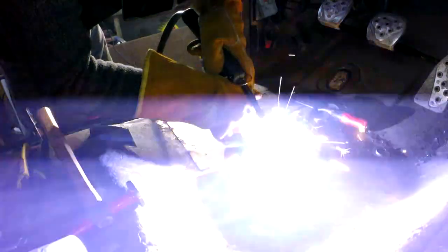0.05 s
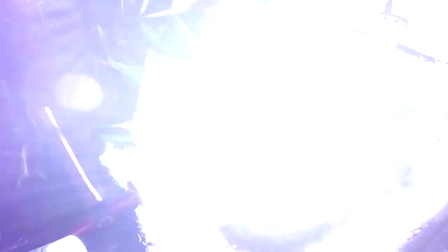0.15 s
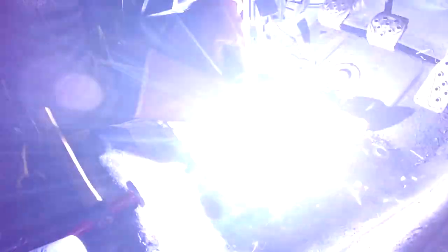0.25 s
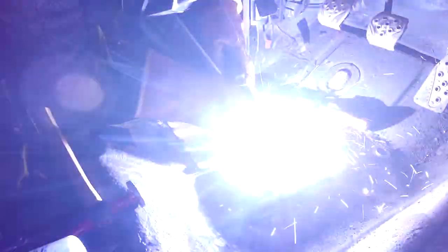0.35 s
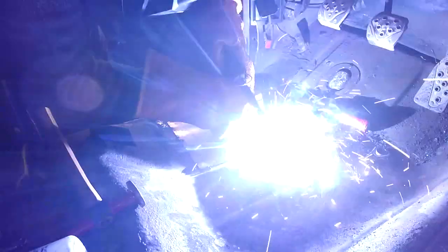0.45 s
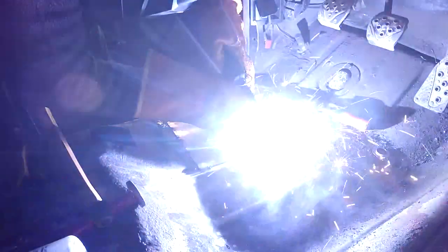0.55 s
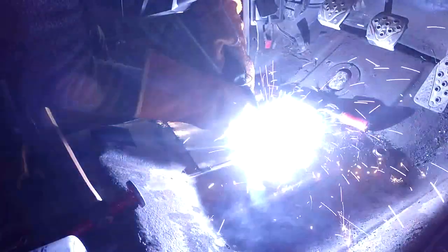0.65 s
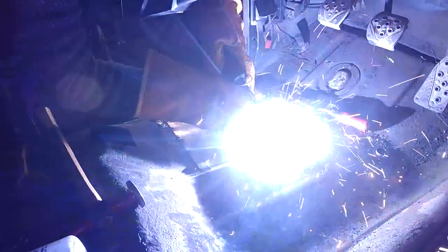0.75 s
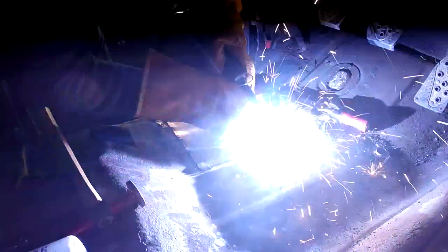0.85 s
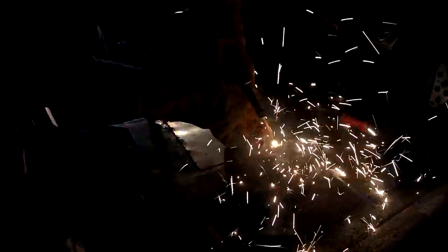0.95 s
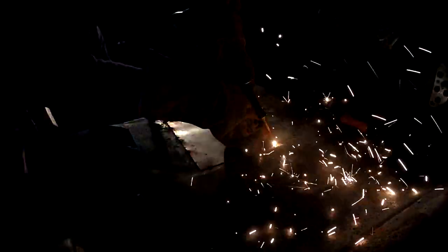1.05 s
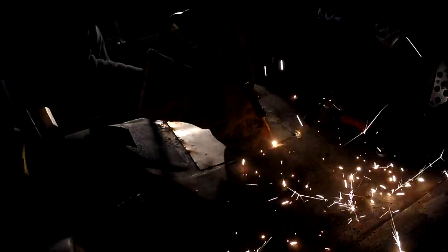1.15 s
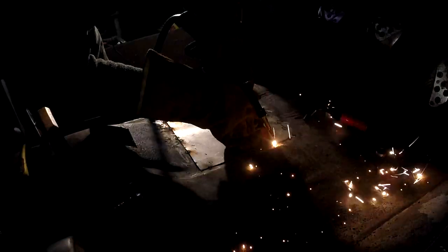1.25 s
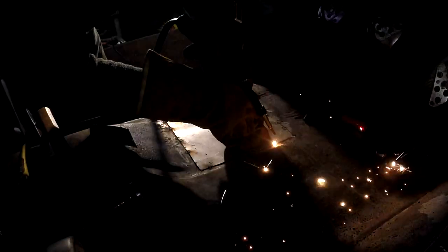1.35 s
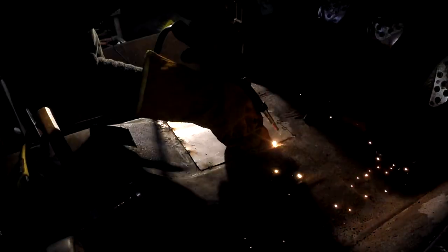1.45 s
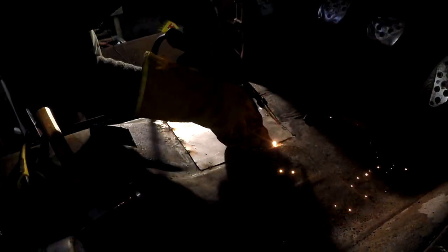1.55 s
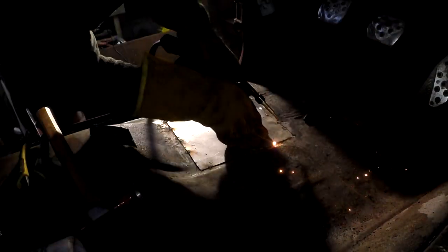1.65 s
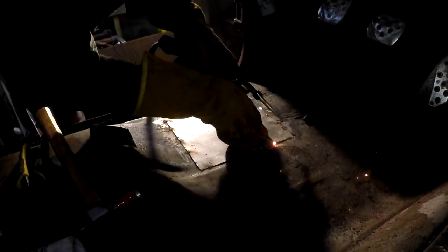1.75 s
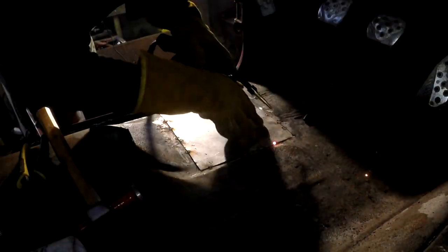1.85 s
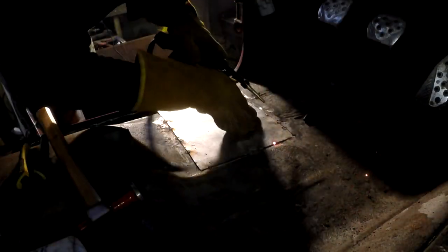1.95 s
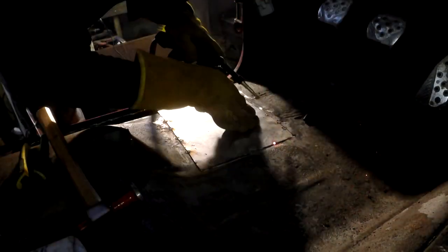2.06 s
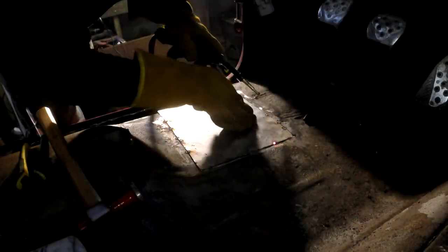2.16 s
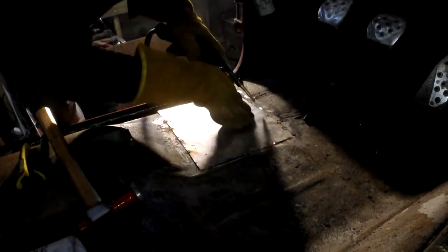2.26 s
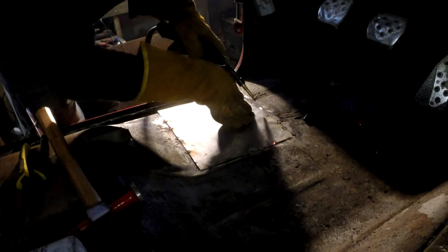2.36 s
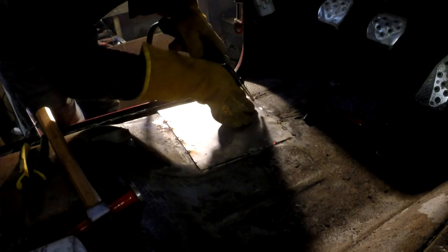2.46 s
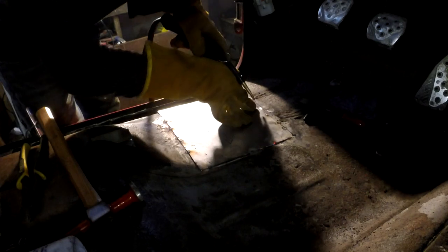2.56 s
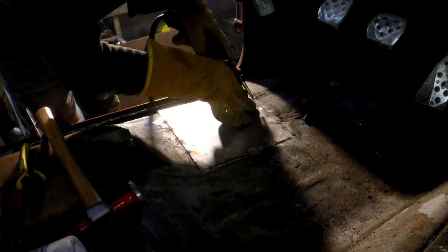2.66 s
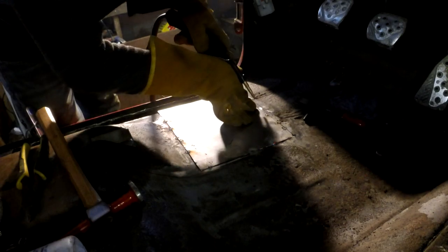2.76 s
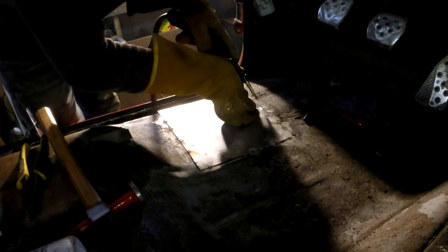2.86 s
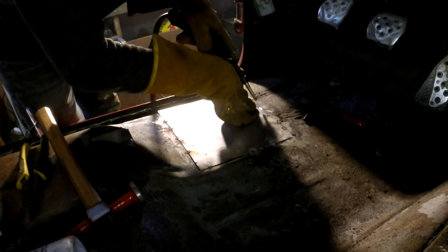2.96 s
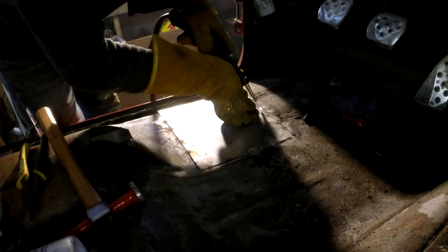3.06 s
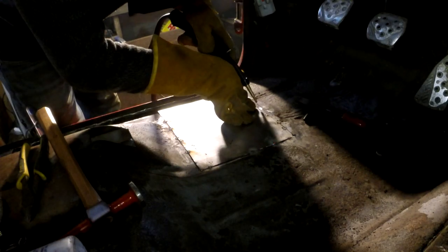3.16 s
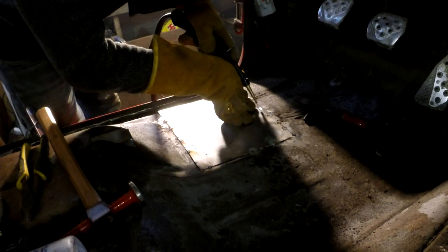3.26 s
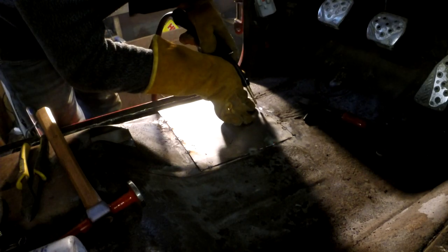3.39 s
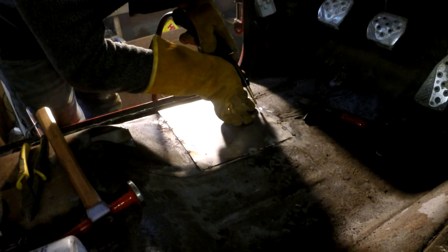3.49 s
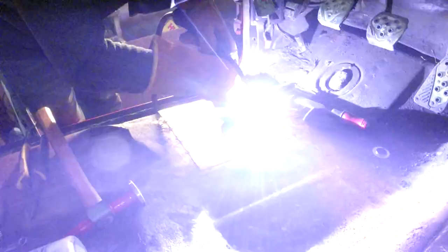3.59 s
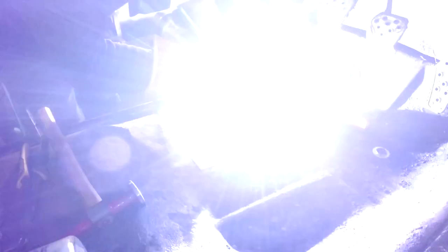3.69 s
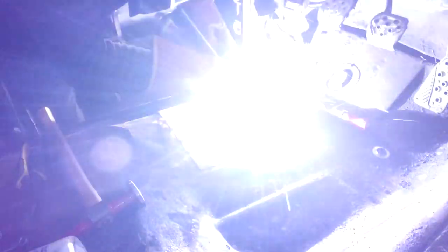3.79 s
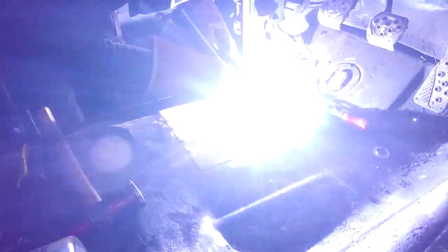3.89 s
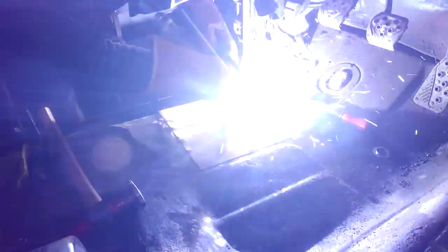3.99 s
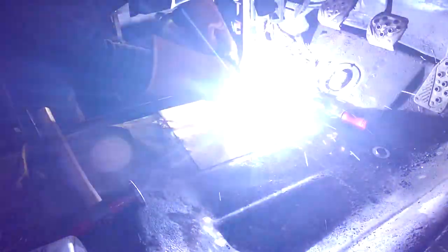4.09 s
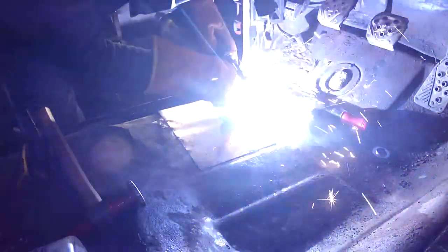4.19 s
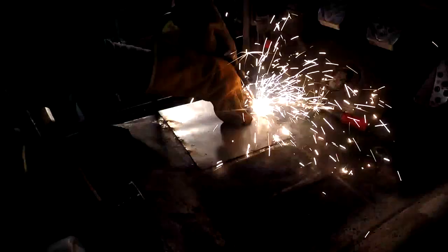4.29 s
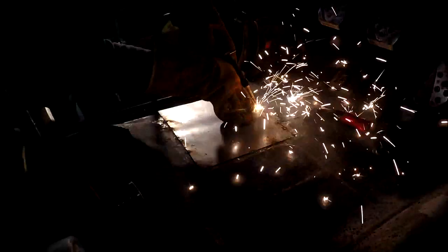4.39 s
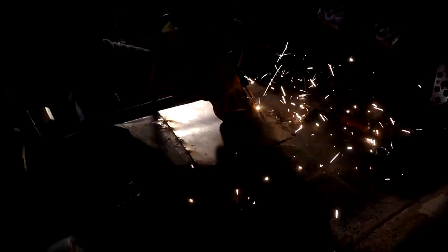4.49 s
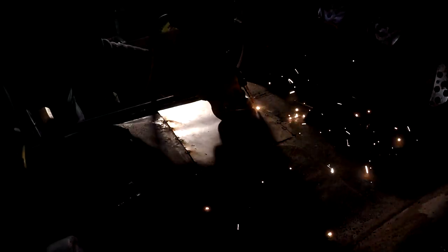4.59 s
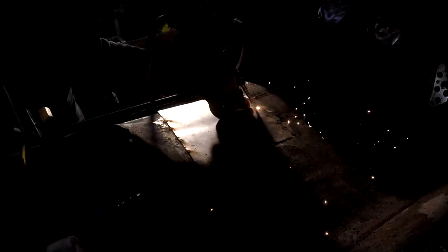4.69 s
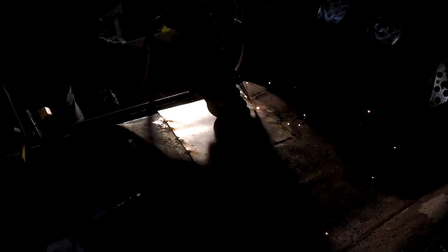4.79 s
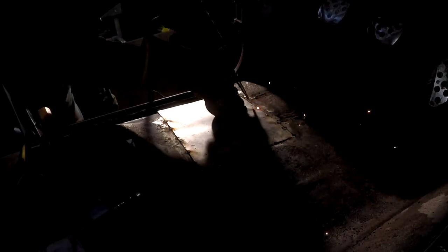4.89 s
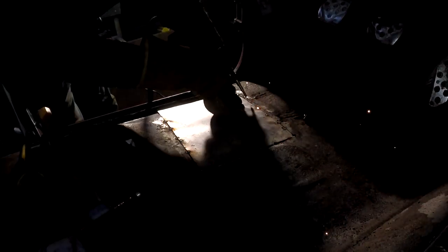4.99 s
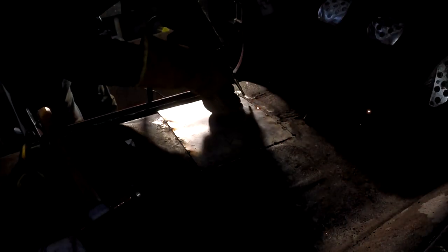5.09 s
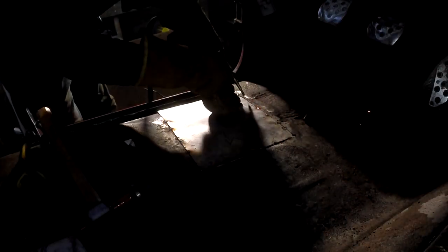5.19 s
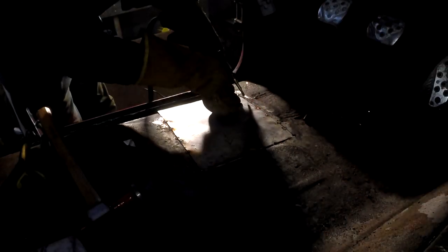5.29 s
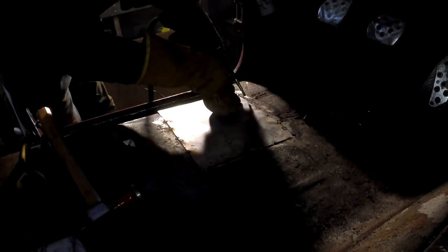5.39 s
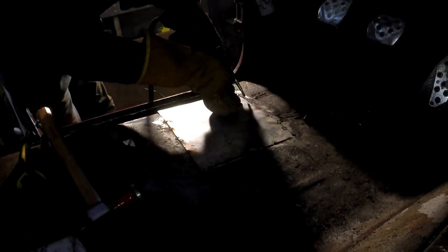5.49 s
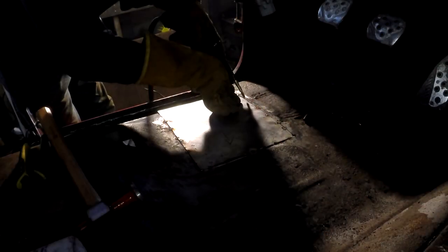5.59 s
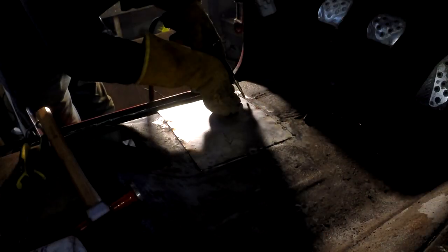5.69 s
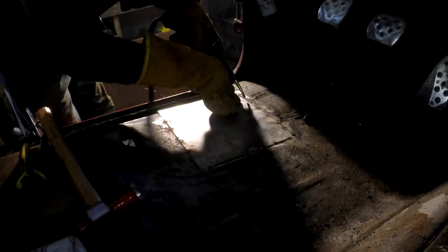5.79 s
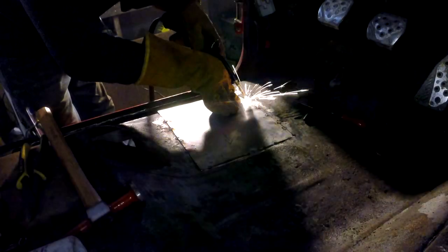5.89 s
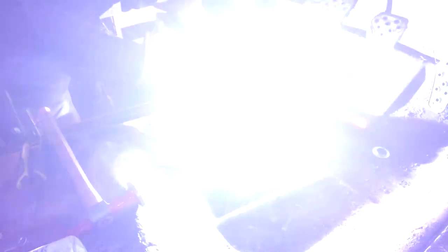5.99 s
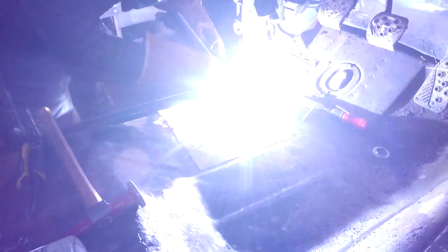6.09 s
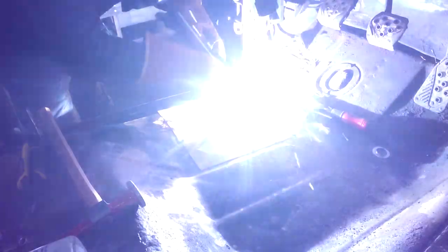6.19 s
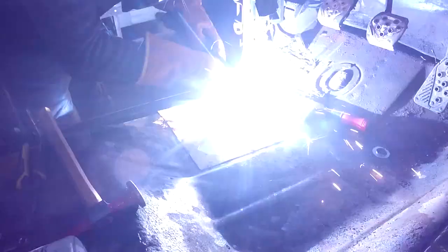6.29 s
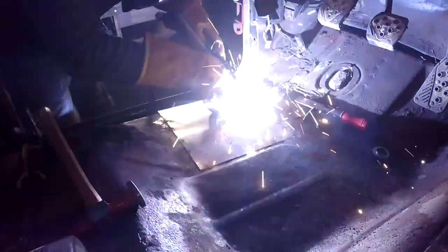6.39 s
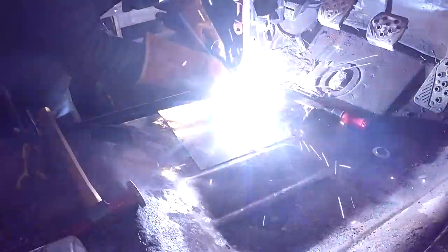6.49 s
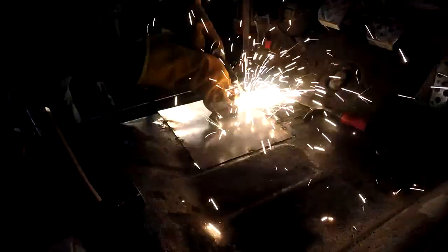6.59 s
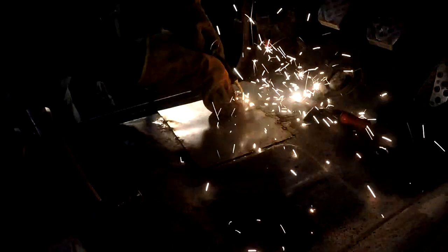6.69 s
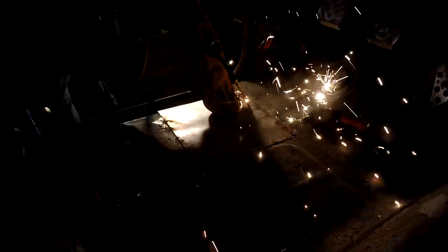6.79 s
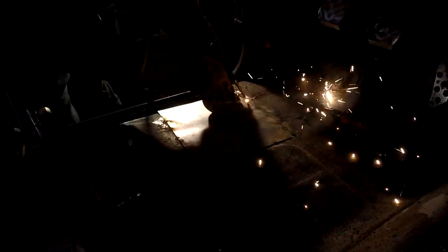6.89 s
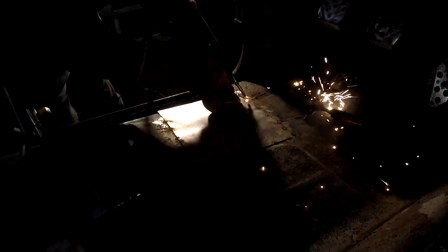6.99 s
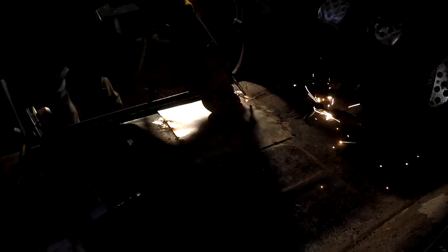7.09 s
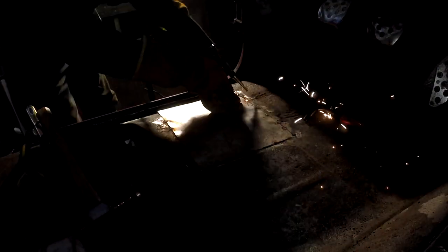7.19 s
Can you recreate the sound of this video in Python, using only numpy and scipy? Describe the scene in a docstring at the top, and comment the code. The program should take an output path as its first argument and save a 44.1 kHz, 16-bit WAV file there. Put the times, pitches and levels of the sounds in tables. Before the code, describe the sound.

A close welding arc sputters and snaps, stops to fading sizzle and droning hum, then fires twice more in brief crackling bursts.

```python
"""An arc is alight at once, close by: sharp pops over a mains-paced crackle, with gas hiss and loaded hum.
The place is the steel floor of a car body in a workshop, where a wire-feed welder lays three short welds.
Pops and crackle are impulse trains, each with a noise spray, rung through cabin reflections and panel modes.
Filtered noise makes the fading sizzle and sliding glove, filtered impulses the ticks, noise bursts the thumps.
The idling machine drones in wavering sines over a noise rush; one microphone hears it all from beside the weld."""
import sys
import numpy as np
from scipy import signal
from scipy.fft import rfft, irfft
from scipy.io import wavfile
from scipy.ndimage import uniform_filter1d

SR = 44100
rng = np.random.default_rng(int(sys.argv[2]) if len(sys.argv) > 2 else 0)


def waveform_to_disk(signal):
    """Save audio, clipped to [-1, 1], as 16-bit WAV at the path in sys.argv[1]."""
    frames = np.transpose(np.atleast_2d(signal))
    scaled = np.clip(frames, -1, 1) * 32767
    samples = np.round(scaled).astype(np.int16)
    wavfile.write(sys.argv[1], SR, samples)


N = 319725
T = np.arange(N) / SR  # time in seconds

MAINS_HZ = 60
HALF_CYCLE_S = 1 / (2 * MAINS_HZ)
TRIGGER_LEAD_S = .03  # current and gas come on this long before the arc
RUN_FADE_DB, RUN_SCATTER_DB = 10.5, 2  # fall over the length of a run of pops; unevenness of its pops
TOP_HZ = 15300  # upper edge of what the recorder keeps

# Levels in the tables are relative; the functions add gains and filters.
# The three welds: start_s, end_s, crackle_db, transformer_hum_db, sizzle_db, sizzle_fading_db_per_s
WELDS = [(-0.001, 1.077, -31.5, 1.5, -54.5, 22), (3.774, 4.448, -31, 3, -59, 22),
         (6.059, 6.764, -31, -6.5, -56, 12)]
# Shielding gas leaving the nozzle: frequency_hz, level_db
GAS_COLOUR = [(1500, -17), (4000, -6.5), (5000, -5), (6500, -8.5), (11000, -12.5), (15500, -4)]
# The transformer under welding load: multiple_of_mains, level_db
LOAD_HUM = [(1, -57.5), (2, -61), (3, -53.5), (4, -56)]
# Air of the workshop: frequency_hz, level_db
SHOP_COLOUR = [(20, -9.5), (50, -5.5), (85, 0.5), (140, -8.5), (230, 0), (340, -10), (520, -7.5), (750, -9),
               (1100, -15), (2200, -21), (4500, -30), (8000, -39.5), (15000, -50)]
# Drone of the idling machine and its fan: pitch_hz, level_db, wander_width_hz
IDLE_HUM = [(61.6, -80, 11), (92.5, -58.5, 4), (186.5, -74.5, 10), (229, -69, 8), (263.7, -53.5, 3.2),
            (378, -70.5, 5), (800, -67, 18)]
# Sizzle of the hot bead: frequency_hz, level_db
SIZZLE_COLOUR = [(400, -8), (1200, 4), (4000, -0.5), (7000, -4), (12000, -10.5), (15500, -13)]
# Spatter landing on the steel: start_s, level_db
TICKS = [(1.2146, -48), (1.267, -47), (1.699, -52), (2.7032, -51), (4.5916, -53), (4.6147, -48.5),
         (5.4611, -57), (5.4835, -55), (6.879, -53.5)]
# The wire burns back and the crackle stalls: start_s, end_s, level_change_db
STALLS = [(0.068, 0.096, -22), (0.125, 0.239, -39), (0.573, 0.606, -10), (1.0, 1.084, -12),
          (3.885, 3.86, -5), (3.991, 4.038, -18), (6.058, 6.108, -4), (6.111, 6.199, -11),
          (6.428, 6.456, -12), (6.555, 6.597, -5.5)]
# The wire stubs into the pool and blows clear, alone or with a run of weaker pops behind:
# start_s, level_db, body_over_snap_db, run_length_s
POPS = [(0.014, -21.5, 9, 0), (0.0257, -19.5, 5, 0), (0.0352, -11.5, -1.5, 0.0094), (0.0403, -21, -5, 0),
        (0.0541, -21, -5, 0.0086), (0.0883, -19, -11, 0), (0.0907, -13.5, 0.5, 0), (0.1721, -20.5, -3, 0),
        (0.2522, -18.5, -10, 0), (0.2560, -18.5, 0, 0.016), (0.2731, -18, 7, 0), (0.2891, -23, 6, 0.004),
        (0.3452, -23.5, -10, 0), (0.4747, -21.5, 2.5, 0.017), (0.5236, -20.5, 1.5, 0.015),
        (0.5492, -19.5, -7, 0.0087), (0.591, -17.5, 1, 0), (0.6028, -16.5, 0, 0.014),
        (0.615, -18.5, 1.5, 0.064), (0.6828, -21, 4, 0), (0.7312, -24, 15.5, 0), (0.8083, -19, -1.5, 0),
        (0.8912, -19, 4, 0.012), (0.9154, -18.5, 2, 0.041), (0.9738, -16, 0, 0), (1.0071, -20.5, 6.5, 0),
        (1.0484, -17.5, -1.5, 0), (1.0743, -24, 6, 0), (3.7795, -12.5, 2.5, 0), (3.7905, -15.5, -5, 0.044),
        (3.833, -17, 1, 0), (3.84, -15.5, -0.5, 0.0084), (3.8995, -15.5, 2, 0.0072), (3.9246, -16.5, 5, 0),
        (3.9652, -26, -12, 0), (3.9997, -16, -1, 0), (4.0354, -17, 0, 0), (4.0678, -20.5, 2, 0.018),
        (4.1423, -15.5, -2.5, 0), (4.1931, -27.5, -7, 0.03), (4.319, -17.5, -1, 0),
        (4.3332, -19.5, 4, 0.04), (4.393, -15, 2, 0), (4.4337, -16, 2.5, 0), (4.4407, -21, -3, 0),
        (4.4565, -22, 0.5, 0), (6.0626, -14, 0.5, 0.0043), (6.1275, -10, -1, 0), (6.2085, -29, 7, 0),
        (6.2113, -19, 7, 0), (6.219, -19, 8.5, 0.0071), (6.292, -23, -3, .012), (6.3098, -24, 1, 0.011),
        (6.3253, -16.5, -4, 0), (6.3343, -20.5, 2, 0), (6.342, -14.5, 2.5, 0.0092), (6.3663, -22, -7, 0),
        (6.3771, -23.5, -3, 0), (6.4104, -19.5, 5, 0), (6.4274, -20.5, 0, 0), (6.46, -24, -2, 0),
        (6.4668, -19, 1, 0), (6.4763, -20, 2, 0), (6.499, -20.5, -2, 0.0051), (6.5256, -22.5, 0, 0.03),
        (6.6084, -24, -4, 0), (6.6252, -25, 7, 0), (6.6423, -20.5, 7, 0.021), (6.6594, -17, 1, 0.003),
        (6.692, -23, 11.5, 0.038), (6.7104, -18.5, -2, 0), (6.7242, -19.5, 3, 0.0074), (6.7585, -19, -1, 0)]
# Colour of the whole arc sound: frequency_hz, level_db
ARC_COLOUR = [(40, -46.5), (110, -16.5), (290, 1), (420, -9), (700, -8), (1000, -1.5), (1900, -3),
              (3100, 0), (4200, 1.5), (5100, -3), (7000, -2.5), (10000, -3), (13000, -9), (15500, -10)]
# Modes of the floor pan at each spot, one list a weld: pitch_hz, width_hz, level_db
PANEL_MODES = [
    [(538, 77, 9), (850, 230, 2.5), (1240, 71, -3), (3000, 87, 4.5), (4080, 130, -2), (4260, 240, -4.5),
     (5240, 340, -5), (9190, 210, -5), (11400, 360, 6)],
    [(560, 37, 10), (790, 21, 6.5), (1293, 13, 5.5), (2316, 370, -1.5), (3210, 110, -9.5),
     (3700, 120, -15.5), (6195, 150, 6), (7100, 350, -0.5), (9570, 300, -12)],
    [(572, 31, 13.5), (873, 66, -1.5), (1327, 29, 5.5), (1630, 33, -1), (2360, 120, 1), (3347, 51, 8.5),
     (3950, 140, 3), (6540, 500, 0), (8840, 68, -20)],
]
# Low thumps and knocks: trigger and current surge, arc rumble, hand and torch on the panel:
# start_s, level_db, pitch_hz, decay_s (by 60 dB)
THUMPS = [(0.017, -35.5, 149, 0.053), (0.087, -43, 80, 0.078), (.14, -48.5, 40, .15), (0.238, -46, 50, .15),
          (1.194, -52, 33, 0.31), (1.604, -48, 26.1, 0.14), (1.639, -50, 40, .12), (1.686, -44, 54, .1),
          (1.748, -44.5, 200, 0.095), (1.94, -45.5, 895, 0.09), (2.343, -46, 668, 0.043),
          (2.421, -42, 580, 0.16), (2.928, -46.5, 45, 0.098), (2.984, -45, 70, 0.067),
          (3.189, -45.5, 35, 0.099), (3.745, -35.5, 168, 0.19), (3.757, -37, 59.7, .08),
          (5.344, -39, 734, 0.046)]
# Glove and sleeve sliding over the panel: start_s, end_s, light_brushing_db, pressed_scraping_db
STROKES = [(1.92, 2.217, -49, -67), (2.26, 2.457, -54, -53), (2.484, 2.675, -57.5, -55),
           (2.6, 3.15, -82, -60), (4.633, 5.35, -56, -47)]
# Light brushing: frequency_hz, level_db
BRUSH_COLOUR = [(600, 0), (2200, -5), (3200, 1.5), (4800, -1.5), (7500, -8.5), (11500, -11.5), (15500, -18)]
# Pressed scraping: frequency_hz, level_db
SCRAPE_COLOUR = [(40, -38), (80, 1), (200, -12.5), (400, 0), (700, 2.5), (1100, 2), (2000, -6.5),
                 (4000, -10), (12000, -27)]


def undb(db):
    """Decibels to gain."""
    return 10 ** (np.asarray(db) / 20)


def unit(x):
    """Scale to rms 1."""
    return x / np.sqrt(np.mean(x ** 2))


def ring(x, response):
    """Pass a sound through an impulse response."""
    return signal.fftconvolve(x, response)[:len(x)]


def colour(x, points, size=4096):
    """Causal filter through (Hz, dB) points that keeps the power of white noise."""
    hz, db = np.transpose(points)
    f = np.maximum(np.arange(size // 2 + 1) * SR / size, 1)
    gain = undb(np.interp(np.log(f), np.log(hz), db))
    # folding the cepstrum forward in time gives minimum phase
    cepstrum = irfft(np.log(gain))
    cepstrum[1:size // 2] *= 2
    cepstrum[size // 2 + 1:] = 0
    response = irfft(np.exp(rfft(cepstrum)))
    return ring(x, response / np.linalg.norm(response))


def band(x, hz, width_hz):
    """One resonance, gain 1 at its centre."""
    return signal.lfilter(*signal.iirpeak(hz, hz / width_hz, fs=SR), x)


def walk(rate_hz):
    """Random levels held 1 / rate_hz seconds and slewed twice; rms 1."""
    hold = int(SR / rate_hz)
    steps = rng.standard_normal(N)[np.arange(N) // hold]
    return unit(uniform_filter1d(uniform_filter1d(steps, hold), hold))


def spikes(times_s, sizes):
    """A train of single-sample impulses."""
    places = np.round(np.asarray(times_s) * SR).astype(int)
    return np.bincount(np.clip(places, 0, N - 1), sizes, N)


def grains(spread_db):
    """Dense tiny clicks of very uneven size; rms 1."""
    uneven = np.clip(rng.standard_normal(N), -2.5, 2.5)
    return unit(rng.standard_normal(N) * undb(spread_db * uneven))


def during(start, end):
    """1 between two moments, 0 outside."""
    return 1. * ((T >= start) & (T < end))


def held(start, end, fall_db_per_s, rise_s=0.0087):
    """A quick rise at the start, steady to the end, then dying away."""
    rise = np.clip((T - start) / rise_s, 0, 1)
    return rise * undb(-fall_db_per_s * np.maximum(T - end, 0))


def tail(t60_s, rise_s, size=16384):
    """A dying cloud of noise with unit energy, falling 60 dB in t60_s."""
    t = np.arange(size) / SR
    cloud = rng.standard_normal(size) * undb(-60 * t / t60_s) * (1 - np.exp(-t / rise_s))
    return cloud / np.linalg.norm(cloud)


def cabin(x, bounce_s=.00033, bounce=0.46, near_db=-5, cabin_db=-1, shop_db=-22, smooth_bins=101):
    """Direct sound, a bounce off the floor pan, nearby panels, the cabin, and the workshop beyond."""
    near = undb(near_db) * tail(.02, 0.0004)
    steel_cabin = undb(cabin_db) * tail(.12, 0.0006)
    shop = undb(shop_db) * tail(.42, 0.012)
    response = near + steel_cabin + shop
    response[0] -= 1  # the direct path
    response[int(bounce_s * SR)] -= bounce
    # the many paths smear a sound in time but favour no broad band
    power = uniform_filter1d(np.abs(rfft(response)) ** 2, smooth_bins)
    levelling = np.column_stack([np.linspace(1, SR / 2, len(power)), -10 * np.log10(power)])
    response = colour(response, levelling)
    return ring(x, response / np.linalg.norm(response))


def load(surge_db=10, surge_s=.1, run_on_s=0.058, fall_db_per_s=180):
    """Current drawn from the transformer: a surge as the trigger closes, a steady hold, then a quick fall."""
    out = np.zeros(N)
    for start, end, _, hum_db, *_ in WELDS:
        on = start - TRIGGER_LEAD_S
        surge = surge_db * np.exp(-np.maximum(T - on, 0) / surge_s)
        out += undb(hum_db + surge) * held(on, end + run_on_s, fall_db_per_s)
    return out


def transformer(waver_db=2):
    """Mains harmonics swell while current is drawn, each wavering in level."""
    hum = np.zeros(N)
    for multiple, db in LOAD_HUM:
        level = undb(db + waver_db * walk(33))
        hum += level * np.sin(2 * np.pi * (multiple * MAINS_HZ * T + rng.random()))
    return np.sqrt(2) * load() * hum


def gas(gas_db=-52, after_s=0.011, flutter_db=1):
    """Gas hisses from the nozzle: the trigger opens its valve just before the wire strikes."""
    valve = sum(during(start - TRIGGER_LEAD_S, end + after_s) for start, end, *_ in WELDS)
    hiss = colour(rng.standard_normal(N), GAS_COLOUR)
    return cabin(hiss * valve * undb(gas_db + flutter_db * walk(40.5)))


def workshop(air_db=-50, waver_db=2.0, drift_db=0.85, sag_db=6):
    """The idling machine drones in wavering lines over the rush of its fan; the drone sags under load."""
    out = undb(air_db + drift_db * walk(5.2)) * colour(rng.standard_normal(N), SHOP_COLOUR)
    sag = sag_db * np.minimum(load(), 1)
    for hz, db, width_hz in IDLE_HUM:
        phase = np.cumsum(hz + width_hz / 2 * walk(25)) / SR
        level = undb(db - sag + waver_db * walk(14))
        out = out + np.sqrt(2) * level * np.sin(2 * np.pi * phase)
    return out


def sparks(flicker_db=1.0, tick_db=21, tick_hz=8000, tick_width_hz=11000, molten_db=7):
    """The bead sizzles under the arc and fades as it cools; single beads of spatter tick on the steel."""
    heat = np.zeros(N)
    for start, end, _, _, db, cooling_db_per_s in WELDS:
        heat += undb(db + molten_db * during(start, end)) * held(start, end, cooling_db_per_s)
    sizzle = colour(grains(spread_db=6.5), SIZZLE_COLOUR) * heat * undb(flicker_db * walk(25))
    s, db = np.transpose(TICKS)
    ticks = band(spikes(s, undb(db + tick_db)), tick_hz, tick_width_hz)
    return cabin(sizzle + ticks)


def burst(shocks, spray_db=-5, spray_s=0.0014):
    """The molten bridge flies apart behind each shock in a brief noise spray, never twice the same."""
    keep = np.exp(-1 / (spray_s * SR))
    power = signal.lfilter([1 - keep], [1, -keep], shocks ** 2 + 1e-18)
    return shocks + undb(spray_db) * np.sqrt(power) * rng.standard_normal(N)


def crackle(start, jitter_s=.0007, scatter_db=5.0, snap_db=-3.0, fizz_db=-7):
    """The wire dips into the pool about once a half cycle; the arc fizzes with the rectified current."""
    late, uneven = rng.standard_normal((N * 2 * MAINS_HZ // SR, 2)).T
    times = np.arange(len(late)) * HALF_CYCLE_S + start % HALF_CYCLE_S + jitter_s * late
    snaps = unit(burst(spikes(times, undb(scatter_db * np.clip(uneven, -2, 1.3)))))
    current = np.cos(2 * np.pi * MAINS_HZ * (T - start)) ** 2
    fizz = unit(grains(spread_db=14.5) * current)
    stall_db = sum(db * during(since, until) for since, until, db in STALLS)
    return (undb(snap_db) * snaps + undb(fizz_db) * fizz) * undb(stall_db)


def pops(start, end, gain_db=20, body_hz=3500, jitter_s=.0004, count=8):
    """Each blown short sends out a shock of low body and high snap; a run repeats it every half cycle."""
    rows = [row for row in POPS if start - .05 < row[0] < end + .05]
    # one row a pop, one column a repeat
    first_s, first_db, body_db, run_s = np.transpose(rows)[:, :, None]
    late, uneven = np.moveaxis(rng.standard_normal((len(first_s), count, 2)), 2, 0)
    after_s = np.arange(count) * HALF_CYCLE_S
    repeat = after_s > 0
    in_run = after_s <= np.abs(run_s)
    s = first_s + after_s + repeat * jitter_s * late
    fade_db = RUN_FADE_DB * after_s / np.maximum(run_s, 1 / SR)
    db = first_db + repeat * RUN_SCATTER_DB * uneven - fade_db
    low = signal.butter(1, body_hz, fs=SR)
    body = signal.lfilter(*low, burst(spikes(s[in_run], undb(db + body_db / 2)[in_run])))
    snap = burst(spikes(s[in_run], undb(db - body_db / 2)[in_run]))
    snap = snap - signal.lfilter(*low, snap)
    return undb(gain_db) * (body + snap)


def arc(panel_db=-1):
    """Pops and crackle of each weld at a new spot, with its own reflections and ringing panels."""
    out = np.zeros(N)
    for (start, end, crackle_db, *_), modes in zip(WELDS, PANEL_MODES):
        burning = during(start + .5 * HALF_CYCLE_S, end)
        x = cabin(pops(start, end) + undb(crackle_db) * crackle(start) * burning)
        panels = sum(undb(db) * band(x, hz, width_hz) for hz, width_hz, db in modes)
        out += x + undb(panel_db) * panels
    return colour(out, ARC_COLOUR)


def thumps(rise_s=.004, width=0.73, gain_db=6):
    """Low thumps and dull knocks, short and damped: noise bursts through a broad resonance."""
    out = np.zeros(N)
    for s, db, hz, t60_s in THUMPS:
        thud = tail(t60_s, rise_s)
        for _ in range(2):
            thud = band(thud, hz, width * hz)
        out += ring(spikes([s], undb([db + gain_db])), thud / np.abs(thud).max())
    return out


def sleeve(catch_db=0.4, attack_share=0.3, release_share=0.18):
    """Leather and cloth catch on the panel in tiny slips, duller when pressed; strokes speed up, hold, slow."""
    brushing, scraping = np.zeros(N), np.zeros(N)
    for start, end, brush_db, scrape_db in STROKES:
        along = (T - start) / (end - start)
        speed = np.clip(np.minimum(along / attack_share, (1 - along) / release_share), 0, 1)
        brushing += undb(brush_db) * speed
        scraping += undb(scrape_db) * speed
    brush = colour(grains(spread_db=4), BRUSH_COLOUR) * brushing
    scrape = colour(grains(spread_db=10.5), SCRAPE_COLOUR) * scraping
    return cabin((brush + scrape) * undb(catch_db * walk(36)))


def scene():
    """All sources at one microphone beside the weld."""
    return (arc() + transformer() + workshop() + sparks() + sleeve() + thumps() + gas())[None]


def record(dry):
    """The recorder clips at full scale, then a steep low-pass cuts the top."""
    low_pass = signal.ellip(10, .2, 70, TOP_HZ, fs=SR, output="sos")
    return signal.sosfilt(low_pass, np.clip(dry, -1, 1))


dry = scene()
out = record(dry)
waveform_to_disk(out)
```